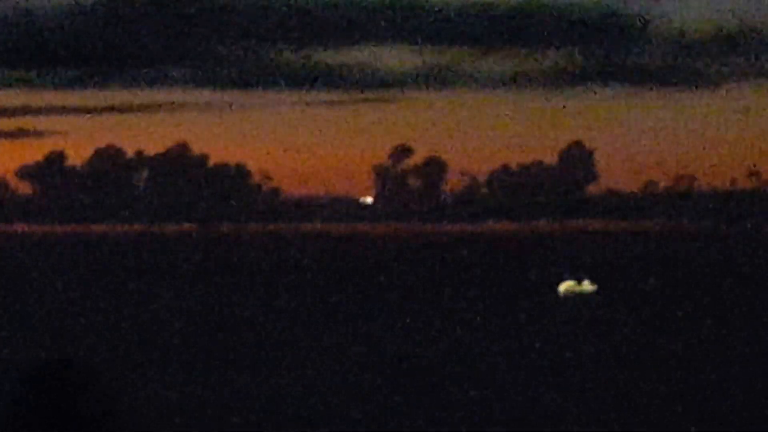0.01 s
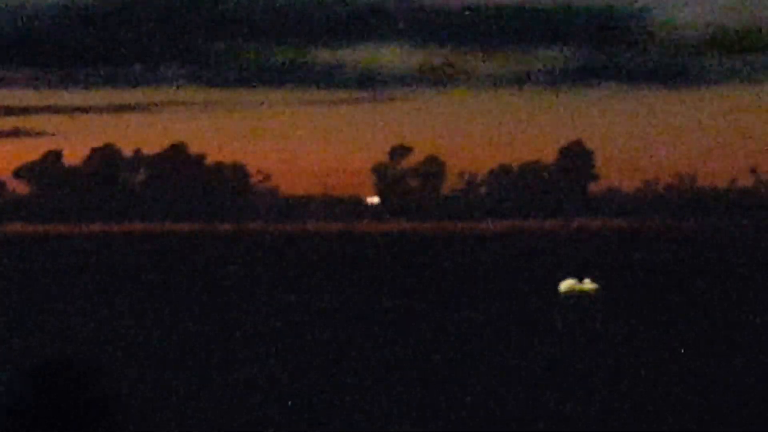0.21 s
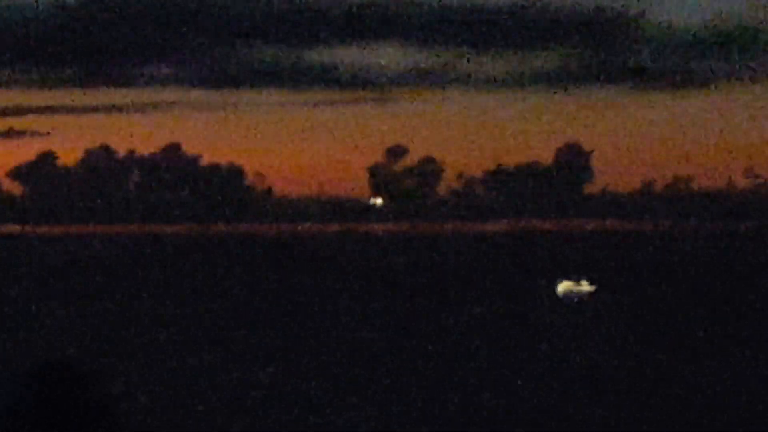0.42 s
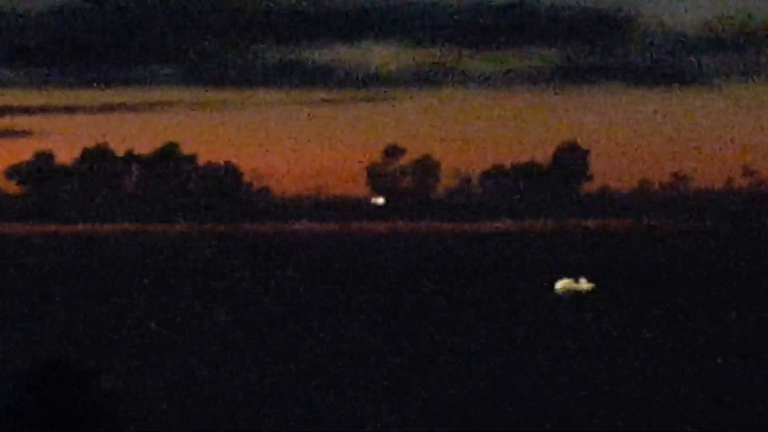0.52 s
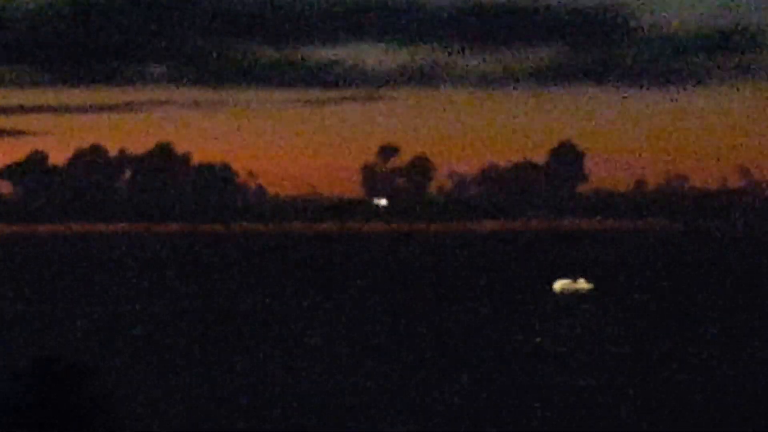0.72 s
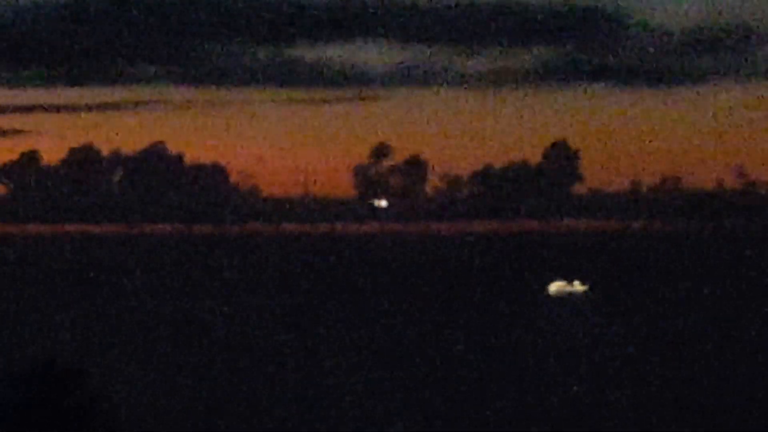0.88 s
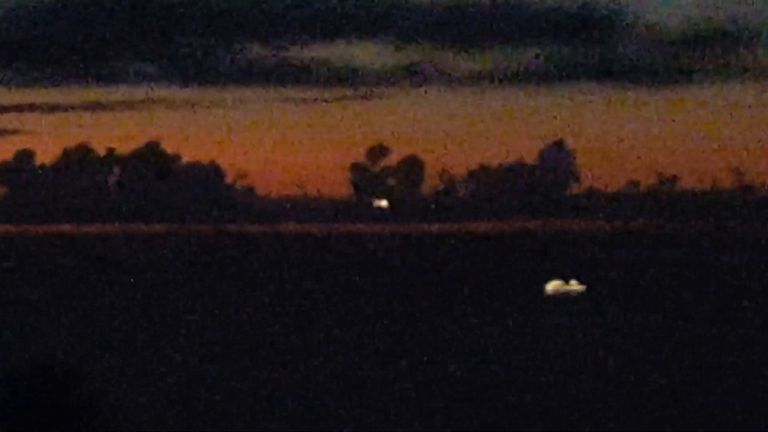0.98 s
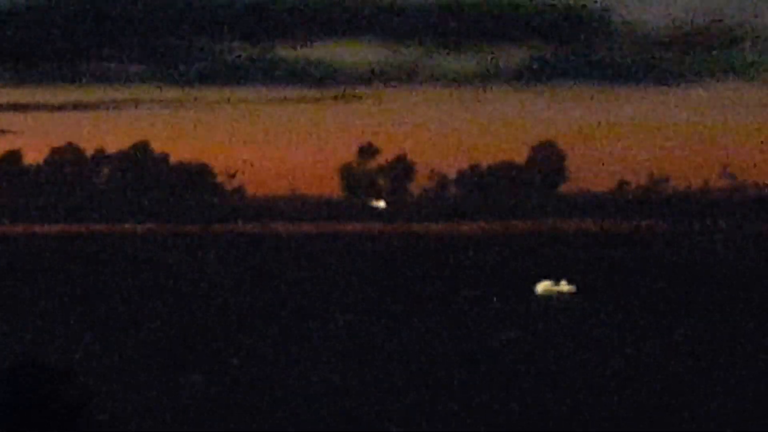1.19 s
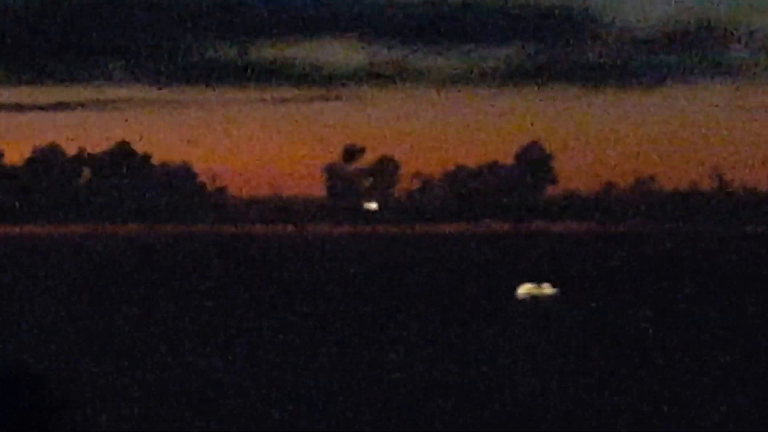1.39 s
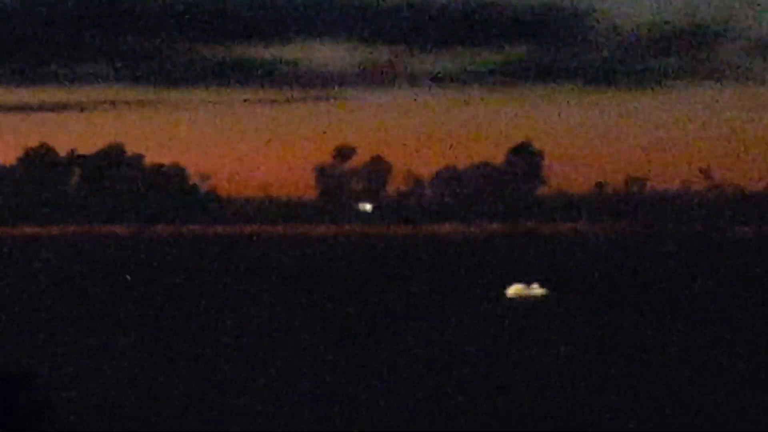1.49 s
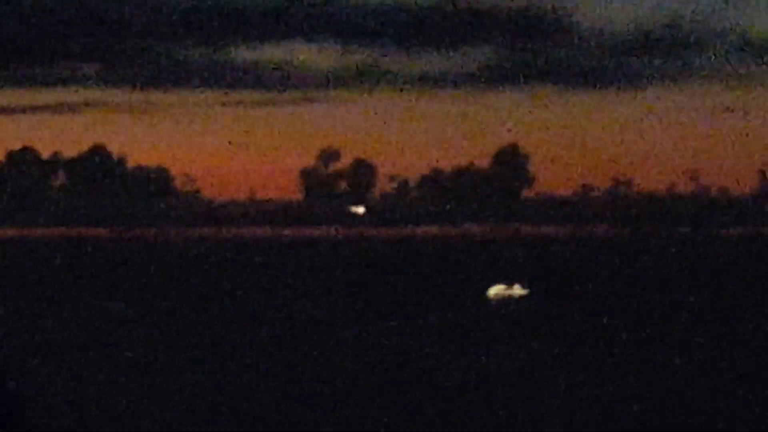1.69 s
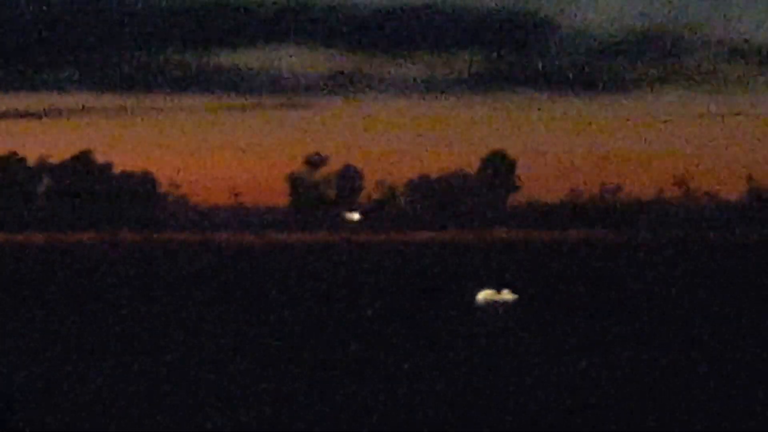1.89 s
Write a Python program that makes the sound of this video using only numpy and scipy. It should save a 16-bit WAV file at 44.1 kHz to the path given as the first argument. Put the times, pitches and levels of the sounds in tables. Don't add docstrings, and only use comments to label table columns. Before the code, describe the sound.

Tree frogs peep in two pitches, several overlapping at first, then scattered single calls; leaves give a short echo, thin insects whine steadily behind, far rumble below, picked up in stereo by a handheld camera outdoors.

```python
import sys
import numpy as np
from scipy import signal
from scipy.fft import rfft, irfft
from scipy.io import wavfile

SR = 44100
rng = np.random.default_rng(int(sys.argv[2]) if len(sys.argv) > 2 else 0)


def volts_from_decibels(level):
    exponent = np.asarray(level, float) / 20
    return 10 ** exponent


def transcribe(signal):
    frames = np.atleast_2d(signal).T
    limited = np.clip(frames, -1, 1)
    pcm = np.round(limited * 32767).astype(np.int16)
    wavfile.write(sys.argv[1], SR, pcm)


N = 85995

SIDES = np.array([[.5], [-.5]])


def evened(x):
    return x / np.sqrt(np.mean(x ** 2) + 1e-20)


def read(points, hz):
    f, value = np.transpose(points)
    return np.interp(np.log(hz + 1), np.log(f + 1), value)


def resonate(x, hz, width):
    turn = np.exp(2j * np.pi * hz * np.arange(x.shape[-1]) / SR)
    r = np.exp(-np.pi * width / SR)
    return 2 * (turn * signal.lfilter([1 - r], [1, -r], x / turn)).real


def air():
    # (frequency [Hz], level [dB per Hz])
    air_curve = [(25, -26), (60, -10.5), (150, -2), (300, -12.5), (700, -20), (1200, -27), (3300, -34.5),
                 (6500, -41.5)]
    # (frequency [Hz], likeness [1])
    likeness = [(60, 0.96), (130, 0.97), (290, 0.91), (640, 0.3), (1400, 0.15)]
    hz = np.fft.rfftfreq(N + 1, 1 / SR)
    left, other = rfft(rng.standard_normal((2, N + 1)))
    same = np.clip(read(likeness, hz), -1, 1)
    right = same * left + np.sqrt(1 - same ** 2) * other
    wash = irfft(np.array([left, right]) * volts_from_decibels(read(air_curve, hz)), N + 1)[:, :N]

    drone_hz, drone_width_hz = 189.3, 18.4
    drone = resonate(rng.standard_normal(N), drone_hz, drone_width_hz)
    drone = resonate(drone, drone_hz, 3 * drone_width_hz)
    return volts_from_decibels(-53.5) * evened(wash) + volts_from_decibels(-56.5) * evened(drone)


def crickets(count=14):
    centre_hz, spread, width_hz, pulse_hz = 5617, 0.027, 205, 89
    t = np.arange(N) / SR
    out = np.zeros((2, N))
    for pitch, rate, phase, side, slow in rng.random((count, 5)):
        hz = centre_hz * (1 + spread * (2 * pitch - 1))
        pulses = np.maximum(np.sin(2 * np.pi * (pulse_hz * (0.5 + rate) * t + phase)), 0)
        surge = 1 + 1.4 * np.sin(2 * np.pi * ((2 + 12 * slow) * t + side))
        voice = resonate(rng.standard_normal((2, N)), hz, width_hz)
        voice = resonate(voice, hz, width_hz)
        stereo = voice + 1.2 * voice[::-1] * SIDES
        out += (.5 + pulses * surge) * stereo * volts_from_decibels(4.3 * (side - .5) * SIDES)
    return volts_from_decibels(-59.5) * evened(out)


def wing(rate, strokes, blur):
    repeat = .4
    place = np.arange(N) / SR * rate % 1
    file = rng.standard_normal((2, 400))[:, (place * 400).astype(int)]
    rasp = repeat * file + (1 - repeat) * rng.standard_normal((2, N))
    strength = blur
    for left, right, width, db in strokes:
        gap = (place - np.array([[left], [right]]) + .5) % 1 - .5
        strength = strength + volts_from_decibels(db) * np.exp(-.5 * (gap / width) ** 2)
    return rasp * strength


def katydids():
    # (frequency [Hz], level [dB per Hz])
    wing_curve = [(7000, -29.5), (8300, -14), (9300, 4.5), (10500, -1), (12800, 3.5), (14200, -2.5),
                  (15000, -12.5), (15800, -22)]
    # (place left [cycle], place right [cycle], width [cycle], level [dB])
    low_strokes = [(0.49, 0.32, 0.069, -0.5), (0.98, .76, 0.0614, 1), (0.079, 1, 0.025, -6.5)]
    high_strokes = [(0.219, 0.17, 0.088, 0.003), (.72, .52, 0.12, 0)]
    zip_strokes = [(.08, .02, .05, 1), (.08, 0.47, .05, -2)]
    buzz_rate_hz, split_hz = 126.75, 12000
    hz = np.fft.rfftfreq(N + 1, 1 / SR)
    high = np.clip((hz - split_hz) / 1200 + .5, 0, 1)
    low = rfft(wing(buzz_rate_hz, low_strokes, .9), N + 1)
    top = rfft(wing(buzz_rate_hz, high_strokes, .9), N + 1)
    colour = volts_from_decibels(read(wing_curve, hz) - 40 * (hz < 6500))
    buzz = irfft((low * np.sqrt(1 - high) + top * np.sqrt(high)) * colour, N + 1)[:, :N]

    zip_rate_hz, zip_hz, zip_width_hz, stop_s = 134.4, 13340, 1520, .79
    sharp = resonate(wing(zip_rate_hz, zip_strokes, .4), zip_hz, zip_width_hz)
    sharp = resonate(sharp, zip_hz, 2 * zip_width_hz)
    stop = np.clip((stop_s - np.arange(N) / SR) / 0.014, 0, 1)
    return volts_from_decibels(-52.5 - 5 * SIDES) * evened(buzz) + volts_from_decibels(-54 + 2.5 * SIDES) * stop * evened(sharp)


def ticks():
    # (time [s], level [dB], length [s], top frequency [Hz])
    tick_events = [
        (1.354, -51.5, 0.007, 1220),
        (1.592, -55.5, 0.0098, 4320),
    ]
    t = np.arange(N) / SR
    out = np.zeros((2, N))
    for s, db, length, hz in tick_events:
        band = signal.butter(N=2, Wn=[200, hz], btype="band", fs=SR)
        puff = signal.lfilter(*band, rng.standard_normal((2, N)))
        out += volts_from_decibels(db) * evened(puff) * np.exp(-.5 * ((t - s) / length) ** 2)
    return out


def note(row, rise, fall, scoop, scoop_s, sag, swell_db):
    start, length, hz, db, pan_db = row
    lag_s = .0004 - .00001 * pan_db
    swell_peak = 0.72
    a = max(int((start - .01) * SR), 0)
    b = min(a + int((length + .03) * SR), N)
    t = np.arange(a, b) / SR - start - (SIDES + .5) * lag_s
    u = np.maximum(t, 0)
    turns = hz * (u + scoop * scoop_s * np.exp(-u / scoop_s) - sag * u ** 2 / (2 * length))
    edge = np.clip(np.minimum(t / rise, (length - t) / fall), 0, 1)
    shape = np.sin(np.pi / 2 * edge) ** 2
    swell = swell_db * (1 - u / (swell_peak * length)) ** 2
    level = volts_from_decibels(db + SIDES * np.clip(pan_db, -25, 25) - swell)
    return a, np.sqrt(2) * level * shape * np.sin(2 * np.pi * turns)


def calls(ko, kee):
    out = np.zeros((2, N))
    sounds = [note(r, rise=0.013, fall=0.02, scoop=0.052, scoop_s=.022, sag=.03, swell_db=6) for r in ko]
    sounds += [note(r, rise=.0022, fall=0.021, scoop=.15, scoop_s=0.042, sag=0, swell_db=5.5) for r in kee]
    for a, x in sounds:
        out[:, a:a + x.shape[1]] += x
    return out


def foliage(x, tail_db, echo_db):
    # (delay [s], left level [dB], right level [dB])
    echoes = [
        (.005, -15, -12),
        (0.01, -11, -12),
        (.021, -13, -16),
        (0.031, -15.5, -18),
        (0.046, -18, -12.5),
    ]
    t60_s = 0.38
    t = np.arange(SR // 2) / SR
    tail = rng.standard_normal((2, len(t))) * volts_from_decibels(-60 * t / t60_s) * np.clip(t / .025, 0, 1)
    path = volts_from_decibels(tail_db) * tail / np.linalg.norm(tail[0])
    path[:, 0] = 1
    for s, *db in echoes:
        path[:, round(s * SR)] += volts_from_decibels(np.array(db) + echo_db)
    return signal.fftconvolve(x, path, axes=1)[:, :N]


def far_frogs(count=170):
    s, size, side = rng.random((count, 3)).T
    s = s * (N / SR + 0.11) - .1
    pitch = 1 + 0.061 * rng.standard_normal(count).clip(-1.8, 1.8)
    rest = np.c_[4 * (size - .5), 10 * (side - .5)]
    ko = np.c_[s[::2], .1 + 0 * s[::2], 1510 * pitch[::2], rest[::2] + [-74.5, 3]]
    kee = np.c_[s, .11 + 0 * s, 2816 * pitch, rest + [-73, 1]]
    return foliage(calls(ko, kee), tail_db=6, echo_db=0)


def scene():
    # (start [s], length [s], pitch [Hz], level [dB], left-right [dB])
    low_notes = [(.01, 0.058, 1474, -61.5, 5.5), (.138, 0.096, 1608, -37.5, 3), (.178, 0.077, 1528, -38, 0),
                 (.252, 0.088, 1582, -42, 6.5), (.428, 0.086, 1686, -40.5, 2), (.52, 0.075, 1538, -58, 21),
                 (.595, 0.06, 1483, -57.5, -11), (.77, .07, 1594, -65, 17.5), (1.141, .076, 1582, -37, 9),
                 (1.216, 0.041, 1559, -42, 19.5), (1.245, .07, 1510, -66, -4), (1.44, 0.021, 1566, -58, 5),
                 (1.485, 0.15, 1481, -54, 4.5), (1.885, 0.071, 1666, -54, 12),
                 (1.885, 0.26, 1482, -55, -13)]
    # (start [s], length [s], final pitch [Hz], level [dB], left-right [dB])
    high_notes = [(-.06, 0.096, 2816, -47, -1), (.12, 0.12, 2851, -52.5, 6.5),
                  (.155, 0.11, 2816, -54, -5.5), (.308, 0.11, 2672, -48.5, -3.5),
                  (.389, 0.11, 2864, -35, 11.5), (.418, 0.11, 2870, -29.5, -7),
                  (0.521, .093, 2791, -40.5, 6), (.79, 0.082, 2945, -50, -2), (.84, 0.16, 2743, -49, -2),
                  (.9, 0.093, 2740, -59, 7.5), (1.03, 0.11, 2992, -61, 1.5),
                  (1.345, 0.2, 2785, -56.5, 12.5), (1.43, 0.11, 2775, -33, 5.5),
                  (1.68, .11, 2650, -57.5, 1), (1.8, 0.13, 2713, -60, -3)]
    # (start [s], length [s], pitch [Hz], level [dB], left-right [dB])
    whistles = [
        (0.22, .115, 3040, -63.5, 4),
        (0.13, 0.1, 3175, -61.5, 8.5),
        (0.18, .075, 3150, -56, 16.5),
        (1.879, 0.093, 7500, -71, 3.5),
        (0.17, 0.11, 4600, -69, 1.5),
    ]
    near_db = -44
    near = calls([r for r in low_notes if r[3] > near_db], [r for r in high_notes if r[3] > near_db])
    mid = calls([r for r in low_notes + whistles if r[3] <= near_db],
                [r for r in high_notes if r[3] <= near_db])
    frogs = foliage(near, tail_db=-9, echo_db=0) + foliage(mid, tail_db=-4.5, echo_db=3) + far_frogs()
    return frogs + air() + crickets() + katydids() + ticks()


def band_limit(x):
    return signal.sosfilt(signal.butter(12, 15710, fs=SR, output="sos"), x)


def record(dry):
    return band_limit(dry)


dry = scene()
out = record(dry)
transcribe(out)
```